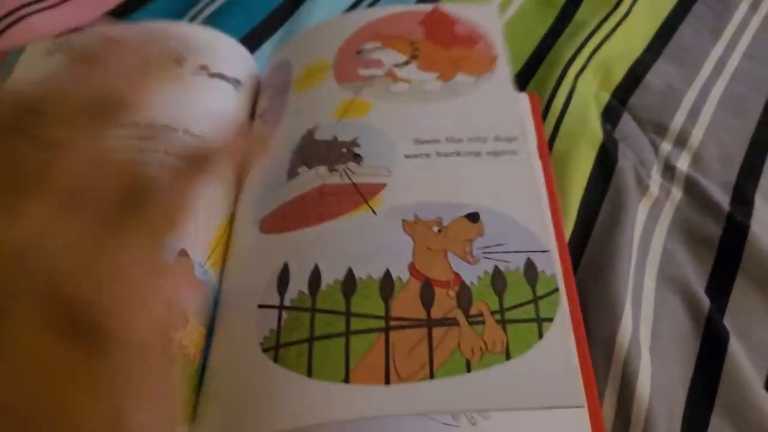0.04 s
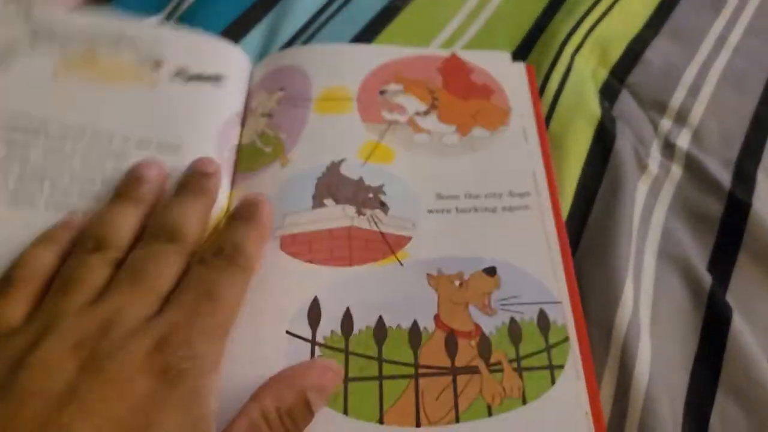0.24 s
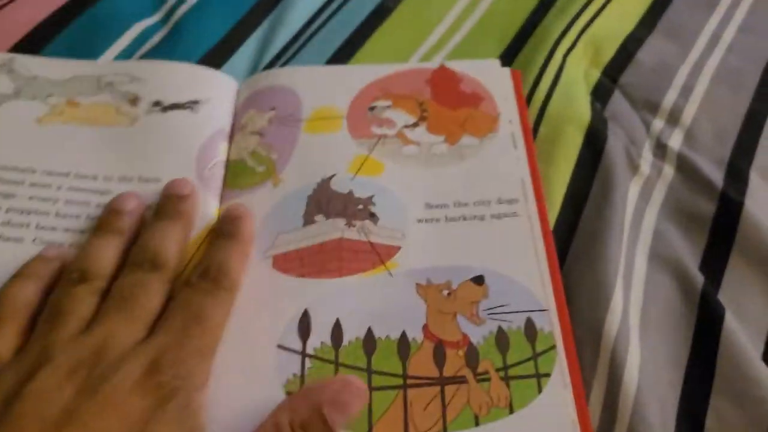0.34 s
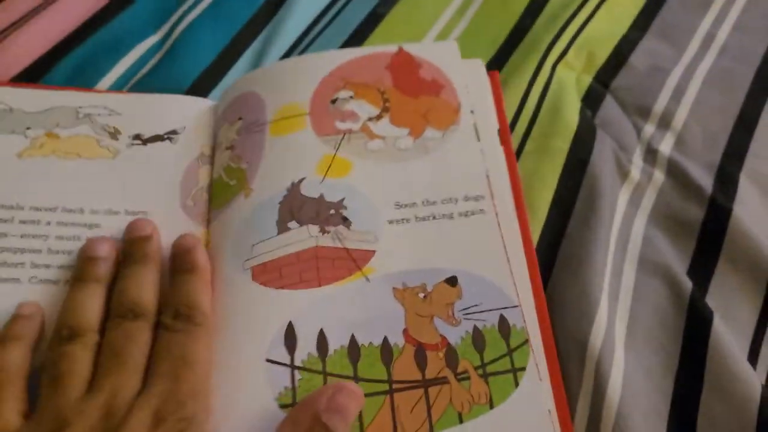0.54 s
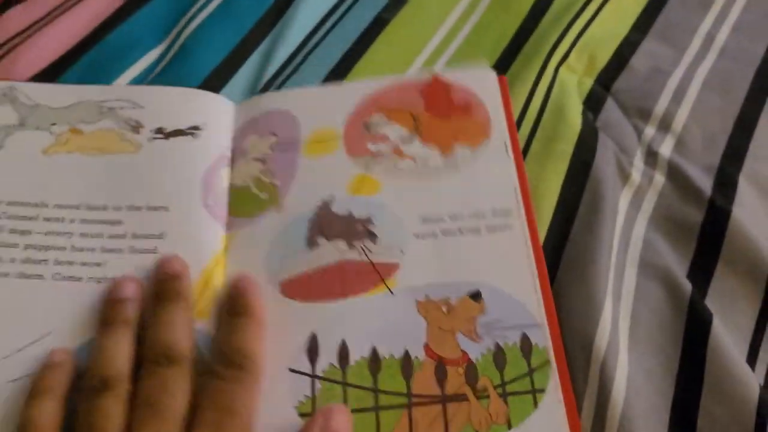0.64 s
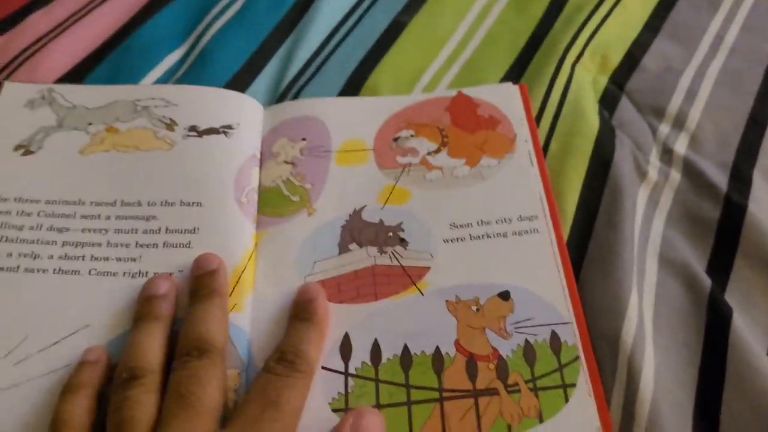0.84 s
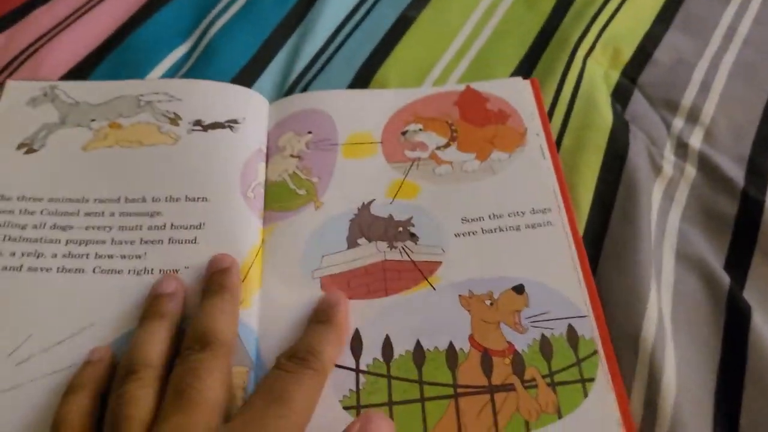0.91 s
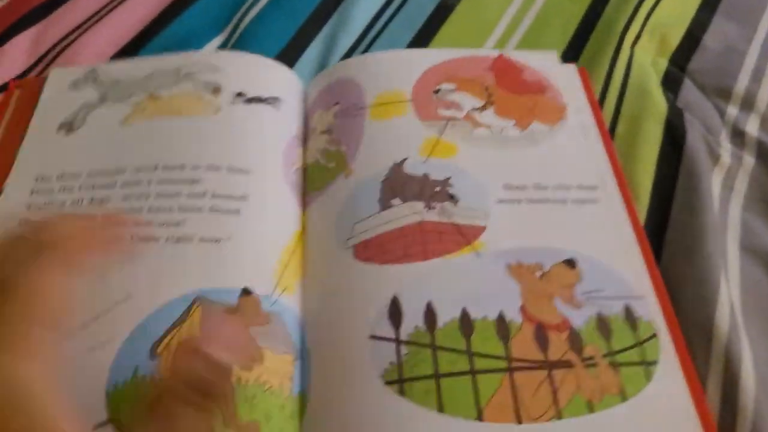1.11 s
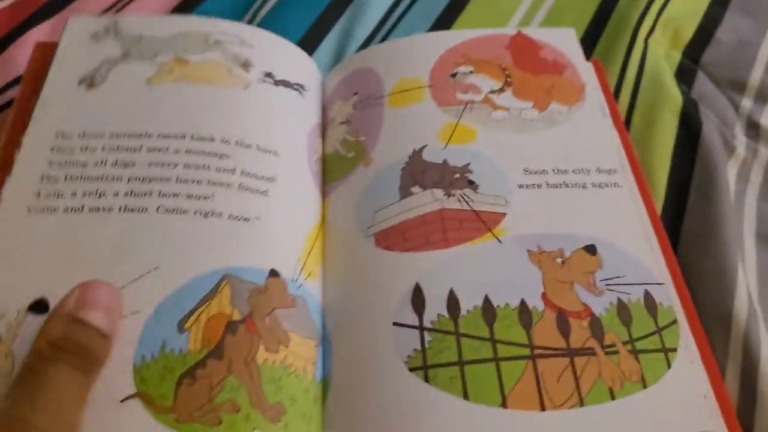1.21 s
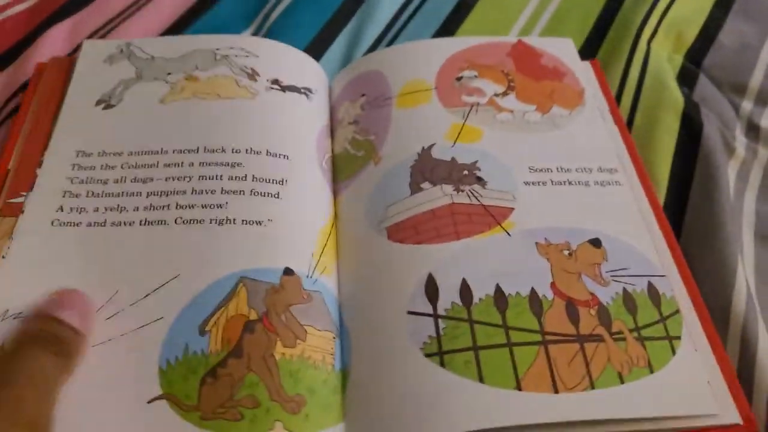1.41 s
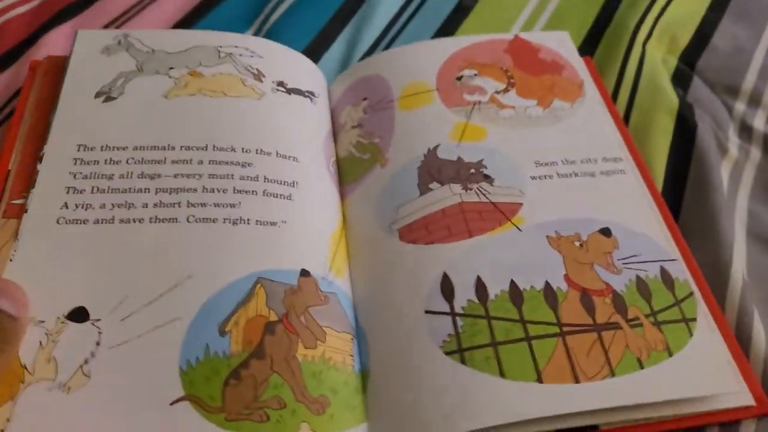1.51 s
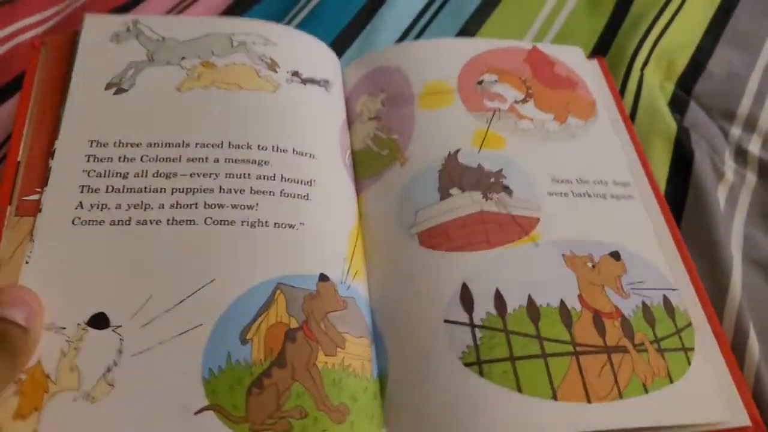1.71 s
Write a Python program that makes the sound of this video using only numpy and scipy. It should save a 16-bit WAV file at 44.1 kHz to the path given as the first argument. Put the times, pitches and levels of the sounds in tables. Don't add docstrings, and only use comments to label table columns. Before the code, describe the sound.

Close-up handling of a hardcover book on a bed: a quick rub, a sharp page snap with crinkling, a hard hissing swipe, quiet fingertip taps, then a softer page drop and fading rustle over faint room hush.

```python
import sys
import numpy as np
from scipy import signal
from scipy.fft import rfft, irfft, next_fast_len
from scipy.io import wavfile
from scipy.ndimage import uniform_filter1d

SR = 44100
rng = np.random.default_rng(int(sys.argv[2]) if len(sys.argv) > 2 else 0)


def store_wav(level_fs):
    pcm = np.round(np.clip(np.atleast_2d(level_fs), -1, 1) * 32767)
    wavfile.write(sys.argv[1], SR, pcm.T.astype(np.int16))


def how_loud(loudness_db):
    steps = np.asarray(loudness_db, float) / 20
    return 10 ** steps


N = 77175
RIGHT_LAG_S = 0.00016


def rms_one(x):
    return x / np.sqrt(np.mean(x ** 2) + 1e-20)


def at_hz(points, hz):
    table_hz, value = np.array(points).T
    return np.interp(np.log(hz), np.log(table_hz), value)


def in_time(rows, column=1, outside=None):
    rows = np.array(rows)
    return np.interp(np.arange(N) / SR, rows[:, 0], rows[:, column], outside, outside)


def drift(rate_hz):
    settle = 20000
    r = np.exp(-2 * np.pi * rate_hz / SR)
    wander = signal.lfilter([1], [1, -2 * r, r * r], rng.standard_normal(N + settle))
    return rms_one(wander[settle:])


def resonate(x, hz, width_hz):
    r = np.exp(-np.pi * width_hz / SR)
    zeros = [(1 - r * r) / 2, 0, (r * r - 1) / 2]
    poles = [1, -2 * r * np.cos(2 * np.pi * hz / SR), r * r]
    return signal.lfilter(zeros, poles, x + 1e-18)


def grains(rate_hz, spread_db):
    size_db = spread_db * np.minimum(rng.exponential(1, (3, N)), 4.0)
    size = how_loud(size_db) * rng.choice([-1, 1], (3, N))
    return size * (rng.random((3, N)) < rate_hz / SR)


def coloured(x, spectrum, patchy_db, dull_db=0):
    size = next_fast_len(N)
    hz = np.maximum(np.arange(size // 2 + 1) * SR / size, 1)
    spec = rfft(x, size) * how_loud(at_hz(spectrum, hz))
    scale = np.sqrt(np.mean(irfft(spec, size) ** 2))
    out = 0
    for band in range(15):
        mask = np.maximum(1 - np.abs(1.5 * np.log2(hz / 30) - band), 0)
        gain_db = patchy_db * drift(21) + dull_db * (band < 13)
        out = out + irfft(spec * mask, size)[:, :N] * how_loud(gain_db)
    return out / scale


def burst(out, s, shape):
    i, out = int(s * SR), out.copy()
    out[:, i:i + shape.shape[-1]] += shape[..., :N - i]
    return out


# (time [s], speed as hiss [dB], pad contact as duller rasp [dB])
STROKES = [
    [(0.0, -50, 2), (0.044, -53, 5.5), (0.06, -37.5, -8), (0.076, -59, 8), (0.112, -73, 5),
     (0.146, -65, 4.5), (0.168, -70, 14), (0.17, -53, 0)],
    [(0.18, -51.5, -8), (0.212, -53, 0.5), (0.22, -81, -7), (0.23, -46, 0), (0.24, -50, 3.5)],
    [(0.25, -51, 3.5), (0.312, -50.5, -1), (0.326, -59, 1.5), (0.38, -58.5, 0.5), (0.414, -49.5, -4.5),
     (0.496, -60.5, 5.5), (0.532, -58.5, 7.5), (0.56, -62, 6.5)],
    [(0.57, -62, 6), (0.6, -58, 4), (0.682, -40, -4.5), (0.72, -45, -1.5), (0.756, -60.5, 4.5),
     (0.79, -87, -3)],
    [(0.8, -73, 2), (0.808, -65, 2), (0.824, -76, -9), (0.846, -68, 0.5), (1.016, -59, -3), (1.05, -54, -1),
     (1.138, -58, 2), (1.17, -79, 4)],
    [(1.18, -81, -2), (1.184, -78, 13), (1.296, -87, 0), (1.306, -62, -3), (1.326, -73, 3), (1.336, -61, 2),
     (1.44, -69.5, 5)],
    [(1.45, -66, 3.5), (1.516, -54.5, -4), (1.602, -66.5, 6.5), (1.638, -79.5, 6), (1.678, -70.5, 1.5),
     (1.712, -78.5, 3), (1.75, -72, 3)],
]
# (frequency [Hz], level per Hz [dB])
PAPER = [(290, -5), (500, -14.5), (855, -2), (1110, -0.5), (2290, 1.5), (4600, 0), (6700, -4.5), (14900, 1),
         (16000, -2)]


def slide():
    rows = sum(STROKES, [])
    rasp = coloured(grains(25000, 2.8), [(200, -62)] + PAPER, 1.5, in_time(rows, column=2))
    lift_db = in_time([(.158, 0), (.164, -30), (.1752, -30), (.1756, 0)])
    return how_loud(in_time(rows) + lift_db + 5.5 + 0.65 * drift(60)) * rasp


# (time [s], level [dB], pitch centre [Hz])
FIRST_BEND = [
    [(.176, -41.5, 1600), (.192, -48.5, 1040), (.196, -35.5, 925), (.199, -35.5, 1060), (.203, -27.5, 1300),
     (.207, -35.5, 1110), (.212, -48, 1200), (.217, -52, 1300), (.2215, -33, 1310)],
    [(.224, -34, 2220), (.233, -29.5, 1830), (.242, -33.5, 1950), (.2465, -27.5, 1120), (.252, -36.5, 1540),
     (.264, -34.5, 1230), (.269, -38.5, 830), (.29, -49.5, 1620), (.33, -59, 1520)],
]
# (time [s], level [dB], pitch centre [Hz])
SECOND_BEND = [(1.303, -56, 2500), (1.312, -47, 1470), (1.328, -60, 1380), (1.339, -46, 2480),
               (1.349, -43, 1270), (1.357, -52.5, 1600), (1.42, -53.5, 2500), (1.46, -62.5, 2160),
               (1.66, -72, 2180)]


def crinkle(rows, spread_oct):
    modes = 20
    centre_hz = in_time(rows, column=2)
    clicks, dealt = grains(12000, 3.84), rng.integers(0, modes, N)
    out = 0
    for k, hz in enumerate(np.geomspace(600, 6000, modes)):
        near = np.exp(-.5 * (np.log2(hz / centre_hz) / spread_oct) ** 2)
        ring = resonate(clicks * (dealt == k) * near, hz, .18 * hz)
        out = out + resonate(ring, hz, .6 * hz) / hz
    level = np.sqrt(uniform_filter1d(np.mean(out ** 2, 0), size=300) + 1e-18)
    return out / level * how_loud(in_time(rows, outside=-120) + 1.2 * drift(150))


# (crest time [s], peak [dB], frequency [Hz], swell centre after crest [s], width [cycles])
SNAP = [
    (.221383, -6.3, 2270, -.00011, .46),
    (.221481, 0.3, 2775, .000075, .48),
]
# (left delay [s], right delay [s], level [dB])
SNAP_ECHOES = [(.00097, .00117, -10), (.00136, .00172, -14), (.00224, .0021, -22), (.0028, .0028, -23),
               (.0036, .0033, -24)]


def snap():
    crack_hz, crack_db, echo_dulling = 7000, -39, .9
    out, t = np.zeros((2, N)), np.arange(N) / SR
    for side, (s, db, hz, lean_s, width) in enumerate(SNAP):
        for *late_s, echo_db in [(0, 0, 0)] + SNAP_ECHOES:
            cycles = (t - s - late_s[side]) * hz * (echo_dulling if echo_db else 1)
            wave = np.cos(2 * np.pi * cycles)
            wave += how_loud(crack_db) * np.cos(2 * np.pi * cycles * crack_hz / hz)
            swell = np.exp(-.5 * ((cycles - lean_s * hz) / width) ** 2)
            out[side] += how_loud(db + echo_db) * wave * swell
    return out


KNOCK_T_S = np.arange(4000) / SR
KNOCK_U_S = np.maximum(KNOCK_T_S - np.array([[0], [RIGHT_LAG_S]]), 0)
# (time [s], paper tick [dB], tick pitch [Hz], board
# thud [dB])
TAPS = [(0.0556, -33.5, 1230, -44.5), (.151, -42, 1510, -46), (0.328, -49, 1300, -45.5),
        (0.344, -38, 1500, -64), (.428, -42.5, 1200, -51), (0.4938, -39, 1800, -46), (0.22, -33, 1010, -62),
        (.4988, -34, 850, -40), (.6605, -36, 1250, -56), (.8505, -52, 2000, -64), (.880, -49, 1100, -54),
        (.921, -50, 600, -52), (.929, -46, 750, -46), (.948, -45, 900, -48), (.952, -52, 2800, -60),
        (.9895, -57, 800, -40), (1.054, -46, 900, -52), (1.0799, -47, 890, -41), (1.1766, -35.5, 2330, -46),
        (1.218, -49, 2200, -54), (1.2219, -41, 1300, -54), (1.234, -54, 1000, -62), (1.341, -43, 3000, -57),
        (1.314, -43, 1300, -47), (1.347, -27.5, 1500, -49), (1.385, -57, 1200, -45)]


def taps(out):
    u, tick_cycles = KNOCK_U_S, 3.5
    for s, db, hz, thud_db in TAPS:
        fade = np.exp(-6.9 * hz * u / tick_cycles) * (1 - np.exp(-6 * hz * u))
        ring = -1.5 * np.sin(2 * np.pi * hz * u) * fade
        thud_fade = np.exp(-u / 0.0036) * (1 - np.exp(-u / 0.0012))
        ring += how_loud(thud_db - db) * np.sin(2 * np.pi * 290 * u) * thud_fade
        out = burst(out, s, how_loud(db + 4.5 + np.array([[-1.5], [1.5]])) * ring)
    return out


# (time [s], peak [dB], frequency [Hz], length [cycles])
THUMPS = [(0.054, -57, 60, 1.6), (0.193, -43, 51, 1.5), (.24, -36.5, 60, 1.8), (0.266, -28.5, 121, 2.3),
          (0.274, -44.5, 60, 6.8), (0.357, -46, 50.3, 0.81), (0.721, -47, 50, 2.2),
          (0.756, -40.5, 260, 2.2), (1.2872, -42, 170, 1.5), (1.298, -40, 170, 1.8), (1.305, -44, 70, 1.8),
          (1.337, -39.5, 60, 1.3), (1.387, -29, 123, 1.7), (1.403, -28, 173, 1.75), (1.414, -27, 95, 0.62),
          (1.441, -49, 124.4, 22), (1.469, -54, 65, 4), (1.21, -53, 133, 5.9), (1.331, -42, 136, 5.6),
          (1.3855, -44, 426, 1.4), (1.398, -42, 300, 1.8), (1.414, -45, 400, 1.7), (.81, -60, 55, 3),
          (.01, -49, 60, 2), (1.646, -59, 50.5, 2.5)]


def thumps(out):
    u = KNOCK_U_S
    for s, db, hz, cycles in THUMPS:
        ring = np.sin(2 * np.pi * hz * u) * np.exp(-6.9 * hz * u / cycles / 2.38)
        out = burst(out, s, how_loud(db) * ring * how_loud([[-1.5], [.6]]))
    return out


# (time [s], level [dB], t60 [s])
FLICKS = [(0.1755, -38, 0.014), (0.8505, -47.5, 0.0054), (1.3053, -56.5, 0.017), (1.333, -55, 0.021),
          (1.338, -69, 0.017)]


def flicks(out):
    t = KNOCK_T_S
    for s, db, t60_s in FLICKS:
        own = np.diff(rng.standard_normal((2, len(t) + 1))) * 0.82
        hiss = own + rng.standard_normal(len(t))
        out = burst(out, s, how_loud(db - 60 * t / t60_s + np.array([[-2.5], [2.5]])) * hiss)
    return out


# (time [s], level [dB])
PRESS = [(0.0, -53), (0.062, -56), (0.112, -62.5), (0.282, -37.5), (0.31, -55), (0.364, -49.5),
         (0.388, -59.5), (0.502, -48.5), (0.52, -49.5), (0.7, -38.5), (0.866, -63), (0.984, -44),
         (1.246, -55), (1.408, -44), (1.446, -60), (1.496, -56), (1.578, -100), (1.75, -57)]
# (frequency [Hz], width [Hz], level [dB])
BOARDS = [(60, 11, 1), (139, 8.9, 9.5), (234, 72, 7.5), (270, 130, -11), (392, 57, -13)]


def boards():
    push, shake = grains(900, 3.68), 0
    for hz, width_hz, db in BOARDS:
        mode = resonate(push, hz, width_hz)
        shake = shake + how_loud(db) * resonate(mode, hz, 5.94 * width_hz)
    return how_loud(in_time(PRESS) - 6.0 + 2.5 * drift(2.4)) * rms_one(shake)


# (time [s], level [dB])
HUM = [(0, -84), (.4, -80), (.46, -63), (.56, -73), (.7, -60), (.8, -58.5), (.88, -65.5), (.93, -83),
       (1.3, -77), (1.6, -82), (1.65, -62), (1.75, -68)]


def hum():
    motor_hz, waver_hz = 147, 1.5
    tone = np.sin(2 * np.pi * np.cumsum(motor_hz + waver_hz * drift(2.2)) / SR)
    return how_loud(in_time(HUM) + 2) * tone * np.ones((3, 1))


# (frequency [Hz], level per Hz [dB])
HUSH = [(18, -43), (30, -18), (141, -2), (303, -8.5), (540, -17), (2350, -14.5), (8980, -30), (14000, -31),
        (16000, -21)]


def hush():
    return how_loud(-61.5) * coloured(rng.standard_normal((3, N)), HUSH, 1.0)


# (frequency [Hz], level [dB])
SHADOW = [(100, 0), (700, 1), (2400, -8), (5000, -1), (15000, -8.5)]
# (frequency [Hz], share [0-1])
DIRECT = [(40, 0), (100, 1), (600, 0.81), (1200, 0.99), (2400, 0.35), (6000, 0), (15000, 0.72)]


def ports(x):
    size = next_fast_len(N + 999)
    hz = np.maximum(np.arange(size // 2 + 1) * SR / size, 1)
    common, left, right = rfft(x, size)
    share = np.clip(at_hz(DIRECT, hz), 0, 1)
    shade = how_loud(at_hz(SHADOW, hz) / 2)
    common, own = np.sqrt(share) * common, np.sqrt(1 - share)
    left = shade * (common * np.exp(2j * np.pi * hz * RIGHT_LAG_S) + own * left)
    right = (common + own * right) / shade
    return irfft([left, right], size)[:, :N]


def scene():
    crinkles = crinkle(sum(FIRST_BEND, []), 0.67) + crinkle(SECOND_BEND, 0.75)
    textures = slide() + crinkles + boards() + hum() + hush()
    knocks = flicks(thumps(taps(np.zeros((2, N)))))
    return ports(textures) + snap() + knocks


def low_pass(x):
    return signal.sosfilt(signal.butter(12, 16910, fs=SR, output="sos"), x)


def record(dry):
    x = signal.sosfilt(signal.butter(3, 42, "high", fs=SR, output="sos"), dry)
    x = signal.sosfilt(signal.cheby2(20, 60, 16330, fs=SR, output="sos"), x)
    return low_pass(x)


dry = scene()
out = record(dry)
store_wav(out)
```